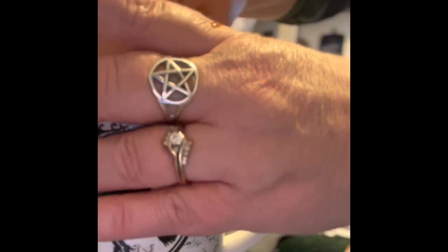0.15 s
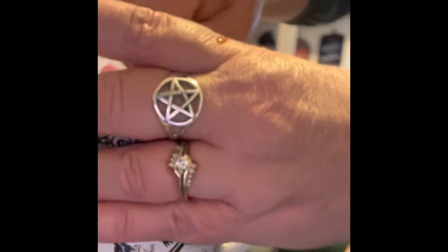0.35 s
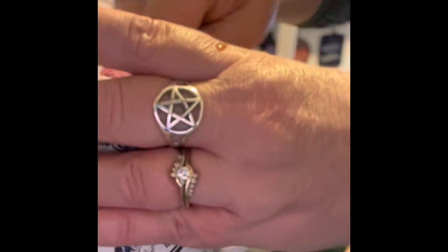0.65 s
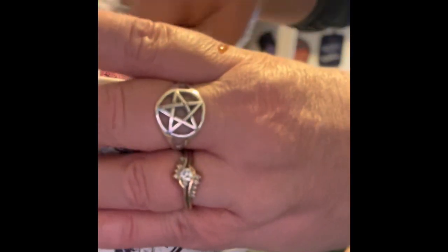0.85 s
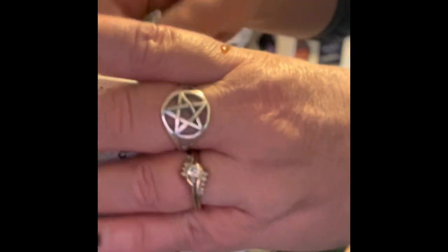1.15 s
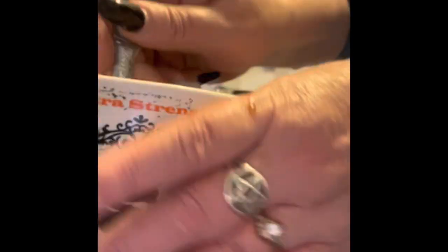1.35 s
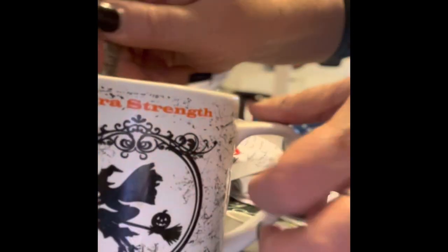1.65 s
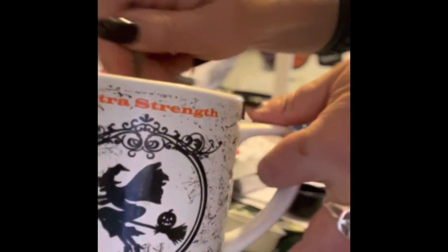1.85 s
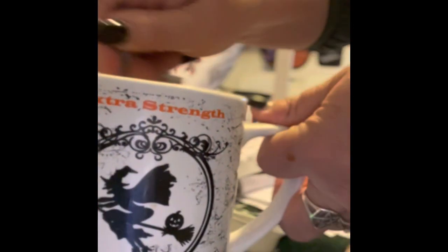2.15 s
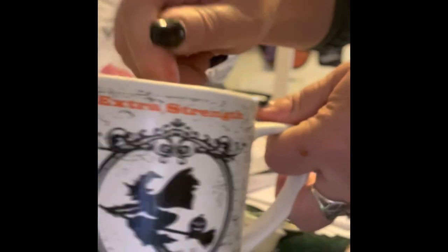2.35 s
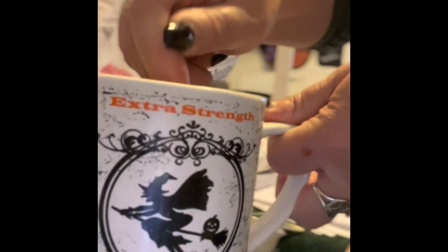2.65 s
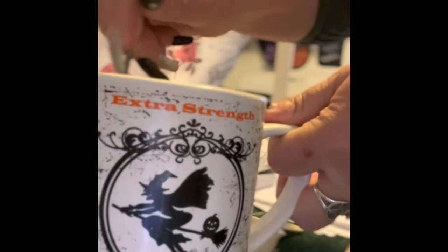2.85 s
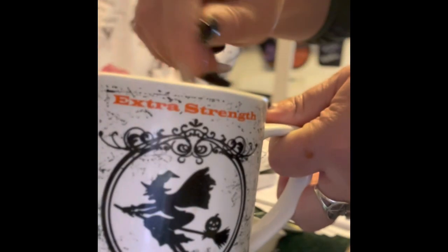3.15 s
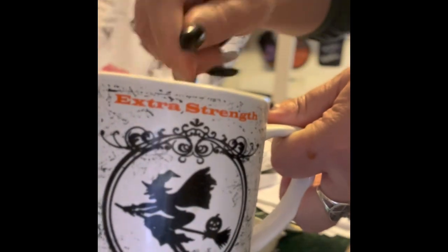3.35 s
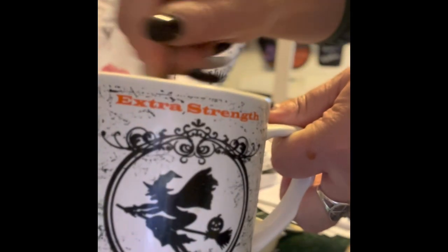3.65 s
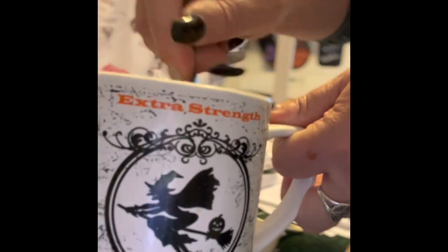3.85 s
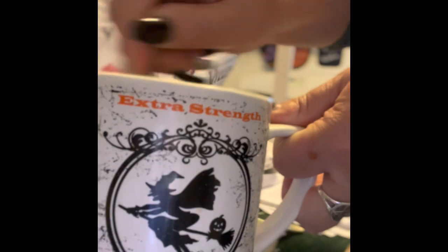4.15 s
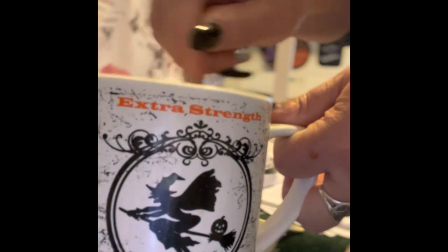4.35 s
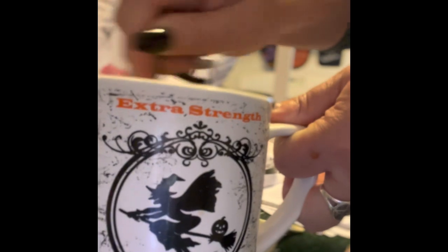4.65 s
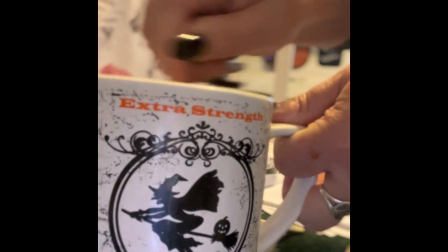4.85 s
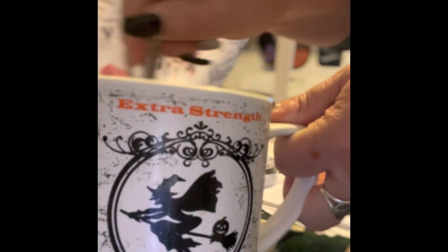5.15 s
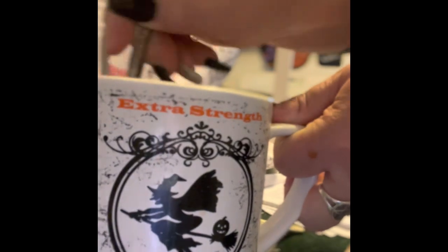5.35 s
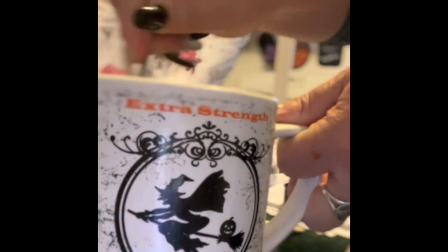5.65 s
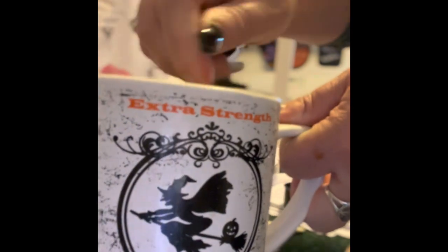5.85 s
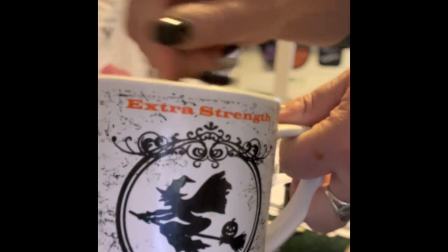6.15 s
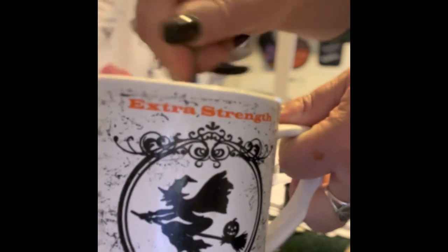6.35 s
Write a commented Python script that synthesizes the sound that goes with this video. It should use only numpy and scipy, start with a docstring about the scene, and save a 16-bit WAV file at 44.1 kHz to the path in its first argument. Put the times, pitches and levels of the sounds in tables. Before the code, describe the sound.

A metal utensil stirs batter in a ceramic mug, scraping and knocking with hollow thuds, short squeals and occasional bright clinks in a quiet kitchen.

```python
"""A metal utensil stirs egg into batter in a ceramic mug, close by in a small kitchen, over a faint appliance hum.
First the metal scrapes over the glaze among dull knocks, which sound the air in the mug, and plops of trapped air.
A hand then rustles past; a clink at 1.5 s sets the freed wall singing, and another rustle comes among longer drags.
From 3 s the knocks are louder, joined by quick whistling swipes and a few short clinks.
Stick-slip squeals, heard earlier as well, return at 5.4-5.8 s; knocks, swipes, a drag and clinks end the stirring."""
import sys
import numpy as np
from scipy import signal
from scipy.fft import rfft, irfft
from scipy.io import wavfile
from scipy.ndimage import map_coordinates

SR = 44100
rng = np.random.default_rng(int(sys.argv[2]) if len(sys.argv) > 2 else 0)


def log_audio(samples):
    """Write samples as a 16-bit WAV file to the path given in sys.argv[1]."""
    # one column per channel
    frames = np.atleast_2d(samples).T
    # limit to full scale, then quantise
    limited = np.clip(frames, -1, 1)
    pcm = np.round(limited * 32767).astype(np.int16)
    wavfile.write(sys.argv[1], SR, pcm)


N = 286650
AGE = np.arange(SR // 3) / SR   # time since a contact (s)

# Event and colour levels below are relative: the functions add their own trims.
# damped knocks on the mug: (time [s], bright click level [dB], click slope [dB/octave],
# mid-range clack level [dB], hollow thud level [dB])
KNOCKS = [(0.13, -60, -3, -75, -68), (0.247, -37, -3, -53, -57), (0.354, -53, 12, -46.5, -37.5),
          (0.383, -39.5, 0, -56, -28.5), (0.549, -39, 4, -48.5, -38.5), (0.645, -53, 3, -56, -50.5),
          (0.681, -32.5, 1, -39, -26.5), (0.851, -37.5, -3, -57.5, -44), (0.87, -24, 4.5, -33, -27.5),
          (0.939, -49, 13, -48, -55), (0.967, -39.5, 7, -34.5, -27.5), (1.284, -39, 0, -43, -43),
          (1.631, -26, -4, -38.5, -29), (1.684, -34, -14, -66, -41), (1.81, -39, 0.5, -44, -31.5),
          (1.823, -39.5, 7, -38, -40), (1.89, -36.5, 1, -53, -60), (1.906, -34, 4, -35.5, -51),
          (1.915, -37, 4, -39.5, -34.5), (2.07, -60, 0, -54, -48), (2.103, -60.5, 6, -55.5, -66),
          (2.205, -31, 0, -36, -33), (2.229, -39.5, 5, -42, -36.5), (2.286, -31, -3, -47, -39),
          (2.508, -41, 8, -48, -49), (2.517, -28, -4.5, -34, -28), (2.687, -54, 9, -59, -48.5),
          (2.733, -68, -9, -57, -55), (2.814, -66, -2, -81, -72), (2.845, -55.5, 15, -57.5, -51.5),
          (2.91, -59, -2, -80, -70), (2.994, -37, 13, -36.5, -39), (3.01, -20.5, -3.5, -28, -29.5),
          (3.217, -55, -1, -67, -59), (3.26, -23, -0.5, -35, -24), (3.321, -33, 8, -48, -45),
          (3.331, -23, 10, -34, -30.5), (3.497, -23.5, -9.5, -33.5, -25), (3.562, -31, 22, -46, -43),
          (3.575, -24.5, 0, -21, -20.5), (3.6759, -36, 17, -65, -65), (3.687, -27.5, 19, -29, -27),
          (3.727, -32.5, 9, -27, -27), (3.8062, -17, -0.5, -43, -39), (3.816, -34, 5, -20, -22.5),
          (3.96, -30, -2, -27, -26.5), (4.053, -40.5, 4.5, -50.5, -62), (4.152, -37, 8, -63, -65),
          (4.163, -43, 5, -49, -56), (4.191, -35, 3, -33.5, -28), (4.287, -35.5, 0.5, -50, -41),
          (4.403, -49.5, 23, -63, -66), (4.411, -43, 13, -60, -55), (4.451, -28, -5.5, -34, -31.5),
          (4.534, -40, -11, -49, -39.5), (4.625, -57, 1, -63, -57), (4.653, -57, 4, -57, -66),
          (4.678, -36.5, -5, -35.5, -30.5), (4.763, -35, 9, -44, -43.5), (4.797, -57, 6, -50, -42.5),
          (4.852, -41, -5, -46.5, -45), (4.893, -27, 13, -39.5, -44.5), (4.931, -47, 4, -42, -34.5),
          (4.999, -38, 6, -55.5, -68), (5.016, -42, 11, -46, -42.5), (5.258, -35.5, 10, -48.5, -53),
          (5.458, -25.5, 10, -37, -36), (5.661, -50, 5, -67, -60), (5.7, -43, 8, -52, -54),
          (5.731, -22, -0.5, -27, -29), (5.814, -34.5, -15, -39.5, -33), (5.91, -55, 1, -68, -68),
          (5.935, -40, 0.5, -53, -59), (6.0, -35, 6, -36.5, -31.5), (6.073, -54, 6.5, -61, -55),
          (6.184, -51, 18.5, -58, -67), (6.2103, -49, 14, -46, -26.5), (6.217, -45.5, 0, -46, -31),
          (6.294, -46, 7, -49.5, -66), (6.309, -30, 18, -27, -23), (6.4572, -22, 3.5, -27, -22)]
# resonances of metal against the filled mug, well damped: (frequency [Hz], width [Hz], level [dB])
BODY_RESONANCES = [(1150, 400, 0), (1604, 80, 0), (1723, 80, 1), (2100, 200, 2), (2330, 150, 2),
                   (2530, 150, 3), (3200, 190, 0), (3470, 200, 1), (3800, 200, 1), (4440, 260, 3),
                   (4730, 140, 3), (5250, 300, 0), (5870, 280, 4), (6400, 250, -1), (7330, 280, 5),
                   (7900, 300, 2), (8630, 260, 0), (9850, 450, -4)]
# colour of the contact noise: (frequency [Hz], level per Hz [dB])
CONTACT_COLOUR = [(150, -53.5), (330, -16.5), (500, -8.5), (900, -0.5), (2000, -7), (3500, -4.5),
                  (7500, 0.5), (9500, -1.5), (11500, -1), (14000, -4.5), (16000, -8)]
# note of the air above the batter, lower while a hand is close to the mug: (time [s], frequency [Hz])
AIR_NOTE = [(0, 634), (1.05, 661.3), (1.7, 679.5), (3, 686.7), (6.5, 694)]
# bumps of the damped mug and batter with the air: (multiple of the air note [1], level [dB], t60 [s])
BUMP_MODES = [(0.682, -11.5, 0.026), (0.839, -2.5, 0.023), (1.5, -4.5, 0.0087)]
AIR_WOBBLE, AIR_SWELL_T60_S = 0.029, 0.031   # share of pitch; decay of the first swell
AIR_LINGER, AIR_LINGER_T60_S = 0.15, 0.11   # share and decay of the lingering note
# the handle splits the lowest wall mode in two: (lower frequency [Hz], upper frequency [Hz])
TWIN_HZ = (1606, 1713.4)

# ringing clinks on the wall: (time [s], bright click level [dB], ring level [dB], t60 [s],
# share of the lower twin mode [0-1])
CLINKS = [(0.1539, -44, -34, 0.017, 1), (1.494, -31, -50, 0.71, 1), (1.578, -29.5, -28, 0.11, 1),
          (3.434, -25, -25, 0.05, 0), (3.9067, -22.5, -23.5, 0.055, 0), (5.141, -27, -34.5, 0.036, 0),
          (5.283, -37, -40, 0.13, 0.86), (5.6079, -49.5, -48.5, 0.05, 0.86), (6.408, -17, -21, 0.06, 1),
          (6.419, -45, -30.5, .035, 0.3)]
# higher modes of the wall: (frequency [Hz], level [dB], t60 as a share of the clink's t60 [1])
WALL_MODES = [(3117, -21, .7), (3542, -17, .6), (4554, -18, .7), (4727, -4, .65), (6051, -15, .45),
              (7355, -11, .5), (8624, -8, .35)]
# bare metal on the wall, brighter the more it clicks rather than rings
CLINK_DB_PER_OCTAVE, CLINK_BRIGHTENING = 2, 0.78

# drags over the glaze: (time of greatest strength [s], rise [s], fall [s], level [dB],
# brightness [dB/octave], first note [Hz], last note [Hz])
DRAGS = [(.064, 0.061, 0.061, -44, -3.5, 1480, 1900), (.12, 0.019, 0.022, -51.5, 0, 1670, 1900),
         (.212, 0.039, 0.032, -41, -6, 1920, 2110), (.367, 0.018, 0.04, -36, -8.5, 1566, 1770),
         (.425, 0.075, 0.055, -35.5, 1, 1590, 2030), (.515, 0.077, .03, -43.5, -7.5, 1580, 1900),
         (.703, 0.035, 0.11, -36, -3.5, 1620, 1780), (.818, 0.061, 0.028, -41.5, -6, 1440, 1900),
         (1.0, 0.051, 0.044, -40.5, -1, 2000, 2190), (1.558, 0.079, 0.065, -45, 7, 1580, 1700),
         (1.7, 0.11, 0.089, -37, -6, 2300, 2000), (1.845, 0.049, 0.052, -42, -1.5, 1700, 2010),
         (1.986, 0.11, .045, -29.5, -2, 1700, 1940), (2.02, 0.027, 0.058, -43.5, -12, 2000, 2100),
         (2.287, 0.08, 0.07, -33.5, -1.5, 2400, 2100), (2.365, 0.031, .05, -55, -15, 2040, 2200),
         (2.448, 0.12, 0.013, -39, 2, 2180, 2700), (2.59, 0.074, 0.053, -31, 0, 1598, 1950),
         (2.71, 0.036, .04, -54.5, -7, 1260, 1300), (3.032, 0.034, 0.027, -35.5, -2, 3100, 2900),
         (4.535, 0.022, 0.018, -31.5, 0.5, 3400, 2950), (5.368, 0.13, 0.092, -41, 1, 1620, 1750),
         (5.437, 0.064, 0.0255, -29, 0, 1756, 2090), (5.465, 0.037, 0.025, -30.5, -1, 3060, 3500),
         (5.712, 0.02, 0.074, -37.5, 8, 1700, 1800), (5.752, 0.03, .044, -30.5, -4, 1600, 1790),
         (5.793, 0.042, 0.054, -31.5, -1.5, 1700, 1997), (6.43, .016, 0.034, -32, -19, 1650, 1750)]
# quick swipes along the wall: (time of greatest strength [s], level [dB])
SWIPES = [(3.288, -40), (3.524, -40), (3.77, -36.5), (4.008, -35), (4.251, -37.5), (4.489, -37.5),
          (4.73, -37), (4.97, -35.5), (6.019, -40.5), (6.26, -39.5)]
SWIPE_RISE_S, SWIPE_FALL_S, SWIPE_START_HZ, SWIPE_DB_PER_OCTAVE = 0.021, 0.0091, 3000, -3
# colour of the rasp: (frequency [Hz], level per Hz [dB])
RASP_COLOUR = [(150, -43), (330, -19), (500, -7), (900, -11), (1700, -3), (2500, -6.5), (3500, -4.5),
               (5700, -3.5), (8000, -5), (10500, 5)]
# partials of the rubbed metal, roughened by slipping: (multiple of its note [1], width [Hz], level [dB])
METAL_PARTIALS = [(1, 219.3, 0), (1.981, 514, -19), (2.751, 632, -27.5), (4.303, 567, 4)]
# harder pressure makes the metal sing: its gain at a reference stroke level, and extra dB per dB above it
SING_DB, SING_GROWTH, RASP_REFERENCE_DB = -9, 0.1, -32
SLIDE = 0.0392   # shift of the damped resonances over one stroke, as a share of their pitch
# wall modes that rubbing keeps alive: (frequency [Hz], level [dB])
RUBBED_MODES = [(2170, -3), (3542, -0.5), (4727, -5.5), (7330, 0.5), (8624, -5)]
RUBBED_DB, RUBBED_T60_S = -8.5, 0.12

# squeals of sticking and slipping metal: (time of greatest loudness [s], length [s], level [dB],
# first note [Hz], last note [Hz])
SQUEALS = [(.41, 0.057, -54, 3470, 3500), (.425, 0.072, -48, 1670, 1734), (.71, 0.039, -56, 3610, 3630),
           (.815, .04, -52, 1640, 1740), (1.0, 0.035, -41.5, 2100, 2186), (1.72, 0.036, -43, 3400, 3110),
           (1.975, 0.053, -34, 1670, 1852), (1.987, 0.025, -30.5, 7300, 7260), (2.0, .03, -46, 2020, 1990),
           (2.3, .035, -42, 3370, 2985), (2.442, 0.034, -46, 2600, 2680), (2.565, .055, -34.5, 1606, 1846),
           (2.595, 0.039, -41, 3150, 3350), (5.365, .06, -38, 1595, 1720), (5.42, 0.059, -40.5, 1704, 2050),
           (5.436, 0.031, -28.5, 3060, 3500), (5.37, 0.059, -39, 7500, 7500),
           (5.435, 0.035, -29.5, 7580, 7330), (5.447, .04, -32, 3730, 4120), (5.462, .04, -35, 3400, 3100),
           (5.775, 0.05, -34.5, 1676, 1873), (5.785, 0.068, -31.5, 7380, 7800)]
SWIPE_WHISTLE_HZ, SWIPE_WHISTLE_DB = 5770, -6.5   # the level is relative to the swipe's own
# singing of the rubbed wall while the hand is off the mug: (time [s], level [dB])
WALL_SONG = [(1.495, -58), (1.55, -31.5), (1.59, -44), (1.66, -41), (1.75, -54), (1.8, -75)]
# wall modes that sing then: (frequency [Hz], level [dB])
SINGING_MODES = [(1604, -4.5), (3542, -24), (4729, -5), (6051, -16), (8624, -27)]

# air pockets opening in the batter: (time [s], level [dB], settled pitch [Hz])
PLOPS = [(.154, -36, 635), (0.247, -34.5, 618), (0.6785, -35, 707), (0.853, -33.5, 670), (1.025, -34, 597),
         (1.243, -59, 1070), (1.284, -40.5, 1110), (2.076, -46.5, 1215), (2.105, -32, 674),
         (2.147, -40.5, 630), (2.353, -43.5, 1091), (2.446, -49.5, 1210), (2.643, -50, 1090),
         (3.945, -38.5, 690), (4.86, -40.5, 1110), (6.025, -40.5, 693), (6.08, -42, 716),
         (6.2117, -29.5, 757), (6.2179, -28.5, 1036)]
# a hand brushing past, a faint high rustle: (middle time [s], length [s], level [dB])
BRUSHES = [(1.204, 0.16, -63), (2.156, 0.17, -63.5)]
# colour of the brushing: (frequency [Hz], level per Hz [dB])
BRUSH_COLOUR = [(900, -18), (3000, -15), (5000, -8), (8500, -9), (10600, -6), (12500, -14), (16000, -42)]

# one clear reflection from a nearby surface
ECHO_S, ECHO_DB = 0.0115, -24
# kitchen reverberation: (band centre [Hz], t60 [s], level [dB])
ROOM_BANDS = [(197, 0.41, -22.5), (510, 0.04, 14.5), (650, 0.24, 3), (930, 0.59, -10), (1720, 0.11, 6.5),
              (2220, 0.18, 8), (3020, 0.14, 8), (4200, 0.19, -2.5), (5740, 0.17, -1), (8500, 0.15, -3),
              (12750, .039, 0.5)]
# the two microphone ports: (frequency [Hz], left lead [rad], left minus right level [dB])
PORTS = [(100, 0, 0), (400, -.2, .5), (630, -.5, 3.4), (720, -.5, 2.6), (1250, -.25, 0), (2400, -.5, 1.5),
         (3600, -.1, 0), (6000, .4, -.5), (8000, 1.05, 0), (11000, 2.6, 0), (15000, 3.1, 0)]
# appliance hum before its waver: (frequency [Hz], rms level [dB])
HUM = [(82.5, -58), (119.5, -82.5), (251, -66)]
# colour of the quiet kitchen: (frequency [Hz], level per Hz [dB])
QUIET_COLOUR = [(20, -38), (45, -1), (75, -9), (105, -0.5), (250, -7.5), (400, -10), (680, -14),
                (1000, -29), (2200, -26), (2900, -39), (4000, -36.5), (8500, -38), (12000, -54.5),
                (16000, -47.5)]
CUTOFF_HZ = 16500


def from_db(db):
    """A level in decibels corresponds to an amplitude ratio."""
    return 10 ** (np.asarray(db) / 20)


def rms_one(x):
    """Normalisation of the mean power sets the rms to 1."""
    return x / np.sqrt(np.mean(x ** 2) + 1e-20)


def onset_one(x):
    """Normalisation of the onset power sets the rms of the first 10 ms to 1."""
    return x / np.sqrt(np.mean(x[:SR // 100] ** 2) + 1e-20)


def at_hz(points, hz, axis=1):
    """A tabulated response is interpolated linearly in log frequency."""
    table = np.array(points)
    return np.interp(np.log(np.maximum(hz, 1)), np.log(table[:, 0]), table[:, axis])


def coloured(spectrum, size):
    """White noise weighted by a spectrum becomes coloured noise, here of rms 1."""
    hz = np.fft.rfftfreq(size, 1 / SR)
    white = rfft(rng.standard_normal(size))
    return rms_one(irfft(white * from_db(at_hz(spectrum, hz)), size))


def drift(rate, size):
    """Straight lines between unit-spread random values, `rate` per second, give a slow fluctuation."""
    steps = np.arange(size) * rate / SR
    return np.interp(steps, np.arange(4096), rng.standard_normal(4096))


def fade(t60):
    """Linear damping gives exponential decay, 60 dB in t60 seconds."""
    return from_db(-60 * AGE / t60)


def mode(hz, t60):
    """A struck mode is an exponentially decaying sine."""
    return np.sin(2 * np.pi * hz * AGE) * fade(t60)


def tilted(sound, slope_db):
    """Brightness is a spectral slope in dB per octave about 5 kHz, level below 2.5 and above 9 kHz."""
    hz = np.fft.rfftfreq(2 * len(sound), 1 / SR)
    octaves = np.log2(np.clip(hz, 2500, 9000) / 5000)
    return irfft(rfft(sound, 2 * len(sound)) * from_db(slope_db * octaves))[:len(sound)]


def add(track, s, sound):
    """Sounds superpose linearly: mix one into a track at a given time."""
    start = int(np.clip(s * SR, 0, N - 1))
    track[start:start + len(sound)] += sound[:N - start]


def knocks(click_db=-1.0, clack_db=-1.5, thud_db=-1.5, wall_db=-3.5):
    """A damped impact excites contact noise and enclosed air, with a trace of the damped wall."""
    out = np.zeros(N)
    for s, bright_db, slope_db, middle_db, hollow_db in KNOCKS:
        wall = rng.uniform(0, 0.59) * mode(TWIN_HZ[0], 0.12) + mode(TWIN_HZ[1], 0.055)
        contact = click(bright_db + click_db, slope_db, middle_db + clack_db)
        add(out, s, contact + from_db(middle_db + wall_db) * wall + from_db(hollow_db + thud_db) * thud(s))
    return out


def click(bright_db, slope_db, clack_db, t60=0.021, crack=2.3, crack_t60=0.0043, attack_s=0.00041):
    """Broadband contact force, a first touch then chatter, drives a bright click over a mid-range clack."""
    envelope = (fade(t60) + crack * fade(crack_t60)) * (1 - np.exp(-AGE / attack_s))
    force = coloured(CONTACT_COLOUR, len(AGE)) * envelope
    struck = body(force, spread_db=5.0, direct=0.64, detune=0.01)
    low = signal.sosfilt(signal.butter(4, 3400, "low", fs=SR, output="sos"), struck)
    high = signal.sosfilt(signal.butter(4, 3400, "high", fs=SR, output="sos"), struck)
    return from_db(clack_db) * onset_one(low) + from_db(bright_db) * onset_one(tilted(high, slope_db))


def body(force, spread_db, direct, detune=0.016):
    """Place of contact and shifting batter alter the strength and pitch of damped resonances."""
    out = direct * force
    chances = rng.standard_normal((len(BODY_RESONANCES), 3))   # strength, sign, pitch
    for (hz, width, level_db), chance in zip(BODY_RESONANCES, chances):
        radius = np.exp(-np.pi * width / SR)
        angle = 2 * np.pi * hz * (1 + detune * chance[2]) / SR
        zeros = np.array([1, 0, -1]) * (1 - radius ** 2) / 2
        poles = [1, -2 * radius * np.cos(angle), radius ** 2]
        ringing = signal.lfilter(zeros, poles, force + 1e-18)
        out = out + from_db(level_db + spread_db * chance[0]) * np.sign(chance[1]) * ringing
    return out


def thud(s):
    """A cavity resonance swells, then dies as a hollow note that the moving batter unsettles."""
    pitch = np.interp(s, *np.transpose(AIR_NOTE)) * (1 + 0.013 * rng.standard_normal())
    phase = 2 * np.pi * np.cumsum(pitch * (1 + AIR_WOBBLE * drift(84, len(AGE)))) / SR
    note = np.sin(phase) * (fade(AIR_SWELL_T60_S) + AIR_LINGER * fade(AIR_LINGER_T60_S))
    bump = 0
    for ratio, db, t60 in BUMP_MODES:
        shift = 1 + 0.05 * rng.standard_normal()
        # modes above the air note start in opposite phase
        bump = bump + np.sign(1 - ratio) * from_db(db) * mode(ratio * pitch * shift, t60)
    return onset_one((note + bump) * (1 - np.exp(-AGE / 0.005)))


def clinks(click_db=0.0, clack_db=-10.0, ring_db=0.0, thud_db=-16.5):
    """Modal excitation depends on position: where the wall is struck decides which twin mode sings."""
    out = np.zeros(N)
    for s, bright_db, wall_db, t60, lower in CLINKS:
        slope_db = CLINK_DB_PER_OCTAVE + CLINK_BRIGHTENING * (bright_db - wall_db)
        ring = onset_one(lower * mode(TWIN_HZ[0], t60) + (1 - lower) * mode(TWIN_HZ[1], t60))
        for hz, db, life in WALL_MODES:
            gain = from_db(db + 2.5 * rng.standard_normal()) * np.sqrt(2)
            ring = ring + gain * mode(hz, t60 * life)
        contact = click(bright_db + click_db, slope_db, wall_db + clack_db)
        add(out, s, contact + from_db(wall_db + ring_db) * (ring + from_db(thud_db) * thud(s)))
    return out


def scrapes(level_db=-2.0, start_db=-16.5, end_db=-29.5, judder_db=1.5, air_db=-14.0, wall_db=-14.0,
            dulling_db=2.5, top_hz=10800):
    """Frictional slips drive mug and air; the metal's own note glides as the contact moves along it."""
    out, size = np.zeros(N), len(AGE)
    soften = signal.butter(8, top_hz, fs=SR, output="sos")
    for s, rise, fall, db, slope_db, from_hz, to_hz in strokes():
        length = rise + fall
        progress = np.clip(AGE / length, 0, 1)
        swell_db = np.interp(AGE, [0, rise, length], [start_db, 0, end_db])
        pressure = from_db(swell_db + judder_db * drift(115.3, size))
        touching = np.clip(np.minimum(AGE, length - AGE) / 0.0072, 0, 1)
        slips = coloured(RASP_COLOUR, size) * grit()
        # reading the rasp at a changing speed slides its resonances
        speed = 1 + np.sign(to_hz - from_hz) * SLIDE * (progress - 0.5)
        resonant = body(slips, spread_db=3.0, direct=0.4)
        sliding = map_coordinates(resonant, [np.cumsum(speed)], order=3, mode="mirror")
        rasp = signal.sosfilt(soften, sliding)
        # the rasp dulls as the stroke slows down
        bright = rms_one(tilted(rasp, slope_db + dulling_db))
        dull = rms_one(tilted(rasp, slope_db - dulling_db))
        rasp = (1 - progress) * bright + progress * dull
        air = rms_one(signal.fftconvolve(slips, thud(s))[:size])
        twins = sum(mode(hz, 0.97) for hz in TWIN_HZ)
        wall = rms_one(signal.fftconvolve(slips, twins)[:size])
        sing = metal_song(from_hz + (to_hz - from_hz) * progress ** 2, top_hz)
        stroke = rasp + from_db(SING_DB + SING_GROWTH * (db - RASP_REFERENCE_DB)) * sing
        stroke = stroke + from_db(air_db) * air + from_db(wall_db) * wall
        stroke = stroke + from_db(RUBBED_DB) * rubbed_wall(slips)
        add(out, s - rise, from_db(db + level_db) * pressure * touching * stroke)
    return out


def strokes():
    """Drags and swipes share one friction law: list both with the columns of DRAGS."""
    swipes = [(s, SWIPE_RISE_S, SWIPE_FALL_S, db, SWIPE_DB_PER_OCTAVE, SWIPE_START_HZ, 0.9 * SWIPE_START_HZ)
              for s, db in SWIPES]
    return list(DRAGS) + swipes


def grit(per_s=200, lift=1.5, t60=0.005):
    """Irregular asperities catch the metal at uneven moments, each a tiny burst over the even rubbing."""
    catches = (rng.random(len(AGE)) < per_s / SR) * rng.uniform(0.3, 2, len(AGE))
    return rms_one(1 + lift * signal.fftconvolve(catches, fade(t60))[:len(AGE)])


def metal_song(note, top_hz):
    """Random modulation by slipping broadens each partial of the rubbed metal."""
    phase = 2 * np.pi * np.cumsum(note) / SR
    out = np.zeros(len(AGE))
    for ratio, width, db in METAL_PARTIALS:
        audible = ratio * note < top_hz
        out += from_db(db) * drift(width, len(AGE)) * np.cos(ratio * phase) * audible
    return out


def rubbed_wall(slips):
    """Sustained excitation keeps higher wall modes ringing as faint, steady streaks in the rasp."""
    out = np.zeros(len(slips))
    for hz, db in RUBBED_MODES:
        ringing = signal.fftconvolve(slips, mode(hz, RUBBED_T60_S))[:len(slips)]
        out += from_db(db) * rms_one(ringing)
    return rms_one(out)


def squeals(level_db=-1.0, wobble_hz=75, rough=0.66, rough_per_s=450):
    """Stick-slip locks briefly onto one note, unsteady in pitch and strength; every swipe whistles too."""
    out, size = np.zeros(N), len(AGE)
    whistles = [(s - SWIPE_FALL_S / 2, SWIPE_RISE_S, db + SWIPE_WHISTLE_DB, SWIPE_WHISTLE_HZ, SWIPE_WHISTLE_HZ)
                for s, db in SWIPES]
    for s, length, db, from_hz, to_hz in list(SQUEALS) + whistles:
        progress = np.clip(AGE / length, 0, 1)
        # the wobble is wobble_hz at 2 kHz
        wobble = wobble_hz * np.sqrt(from_hz / 2000) * drift(rough_per_s, size)
        note = from_hz + (to_hz - from_hz) * progress + wobble
        strength = 1 + rough * drift(rough_per_s, size)
        tone = rms_one(strength * np.sin(2 * np.pi * np.cumsum(note) / SR))
        add(out, s - length / 2, from_db(db + level_db) * np.sin(np.pi * progress) ** 2 * tone)
    return out


def wall_song():
    """Friction replaces the energy lost by the undamped wall, so its modes keep ringing."""
    t = np.arange(N) / SR
    level = from_db(np.interp(t, *np.transpose(WALL_SONG), left=-np.inf, right=-np.inf))
    song = sum(from_db(db + 4.2 * drift(60, N)) * np.sin(2 * np.pi * hz * t) for hz, db in SINGING_MODES)
    return level * song


def plops(level_db=0.0, overshoot=1.0, settle_s=0.00025, cycles=16.4):
    """An air pocket opening into the mug resonates: its note starts high and drops at once."""
    out = np.zeros(N)
    for s, db, hz in PLOPS:
        phase = 2 * np.pi * np.cumsum(hz * (1 + overshoot * np.exp(-AGE / settle_s))) / SR
        note = np.sin(phase) * fade(cycles / hz) * (1 - np.exp(-AGE / 0.0013))
        add(out, s, from_db(db + level_db) * onset_one(note))
    return out


def batter(per_s=28.0, spread_db=4.5):
    """Adhesive films part at random: sticky batter leaves the moving metal with tiny wet ticks."""
    moving = np.zeros(N)
    for s, *_ in KNOCKS:
        add(moving, s - 0.06, np.hanning(SR // 8))
    happens = rng.random(N) < per_s / SR
    sizes = from_db(spread_db * np.clip(rng.standard_normal(N), -2, 2)) * happens
    tick = from_db(-64) * onset_one(coloured(CONTACT_COLOUR, len(AGE)) * fade(0.01))
    return signal.fftconvolve(sizes * np.minimum(moving, 1), tick)[:N]


def brushes():
    """Soft friction radiates broadband noise: skin slides past the mug."""
    out = np.zeros(N)
    for s, length, db in BRUSHES:
        swell = np.sqrt(np.abs(np.sin(np.pi * np.clip(AGE / length, 0, 1))))
        add(out, s - length / 2, from_db(db) * swell * coloured(BRUSH_COLOUR, len(AGE)))
    return out


def reflection(x):
    """A plane surface returns a delayed, weaker copy of the sound."""
    out = np.zeros(N)
    add(out, ECHO_S, from_db(ECHO_DB) * x)
    return out


def kitchen(x, build_s=0.00017):
    """Diffuse reflections build up quickly and decay at a rate that depends on frequency."""
    hz = np.fft.rfftfreq(len(AGE), 1 / SR)
    white = rfft(rng.standard_normal(len(AGE)))
    centres = np.array(ROOM_BANDS)[:, 0]
    tail = 0
    # each row of the identity selects one band, crossfaded into its neighbours
    for weights, (_, t60, db) in zip(np.eye(len(centres)), ROOM_BANDS):
        band = irfft(white * at_hz(np.c_[centres, weights], hz), len(AGE))
        tail = tail + from_db(db) * band * fade(t60)
    tail = tail * (1 - np.exp(-(AGE / build_s) ** 2))
    return signal.fftconvolve(x, tail / np.sqrt(np.sum(tail ** 2)))[:N]


def ports(x):
    """Spaced receivers differ in phase and level: each port takes half the difference."""
    hz = np.fft.rfftfreq(2 * N, 1 / SR)
    tilt = np.exp(0.5j * at_hz(PORTS, hz)) * from_db(at_hz(PORTS, hz, axis=2) / 2)
    return irfft(rfft(x, 2 * N) * np.array([tilt, 1 / tilt]))[:, :N]


def background(quiet_db=-53.0, side_db=-18.5, waver=0.26):
    """Stationary noise gives soft rumble and hiss; hum tones waver in amplitude and phase."""
    t = np.arange(N) / SR
    hum = np.zeros(N)
    for hz, db in HUM:
        strength = from_db(db) * np.sqrt(2) * (1 + waver * drift(7.7, N))
        hum += strength * np.sin(2 * np.pi * hz * t + drift(5.6, N))
    middle = coloured(QUIET_COLOUR, N)
    side = coloured(QUIET_COLOUR, N) * np.array([[1], [-1]])   # opposite in the two channels
    return hum + from_db(quiet_db) * (middle + from_db(side_db) * side)


def scene(room_db=-12.5, wide_db=-13.0):
    """Direct sound, reflections and background superpose."""
    mug = knocks() + clinks() + scrapes() + squeals() + wall_song() + plops() + batter() + brushes()
    diffuse = np.array([kitchen(mug), kitchen(mug)])   # independent left and right
    central = mug + reflection(mug) + from_db(room_db) * kitchen(mug)
    return ports(central) + from_db(wide_db) * diffuse + background()


def record(dry):
    """An elliptic low-pass filter limits the bandwidth steeply."""
    return signal.sosfilt(signal.ellip(10, 0.1, 80, CUTOFF_HZ, fs=SR, output="sos"), dry)


dry = scene()
out = record(dry)
log_audio(out)
```